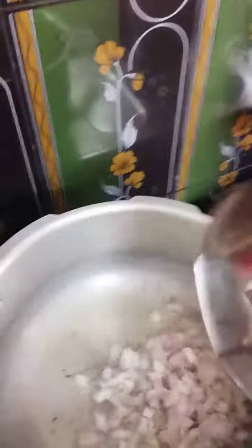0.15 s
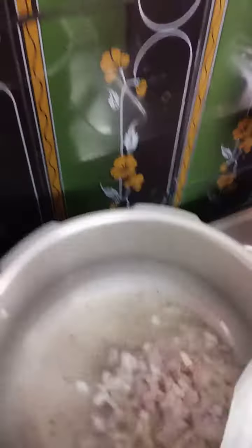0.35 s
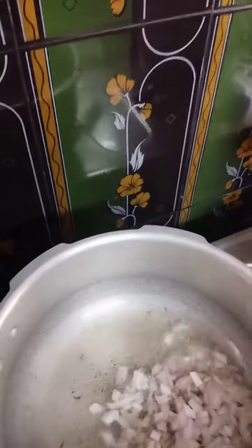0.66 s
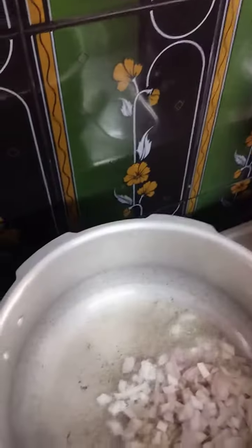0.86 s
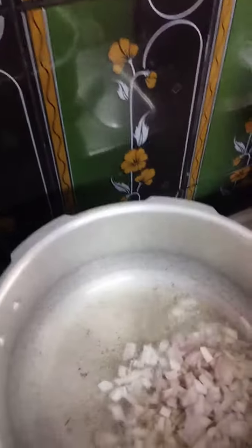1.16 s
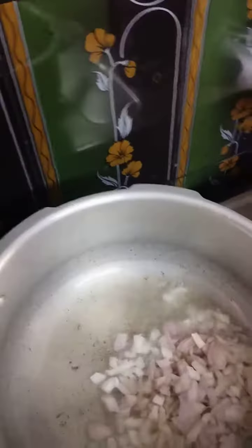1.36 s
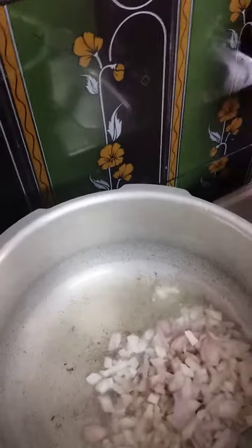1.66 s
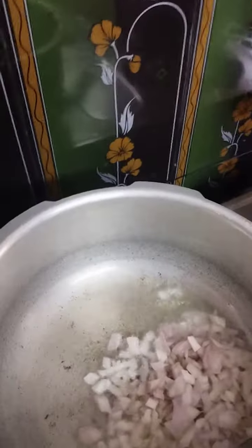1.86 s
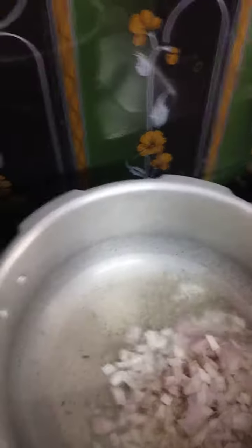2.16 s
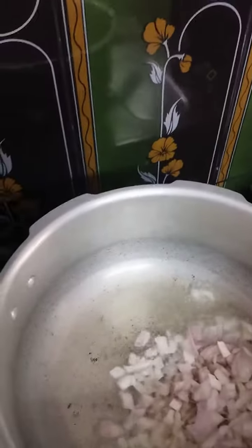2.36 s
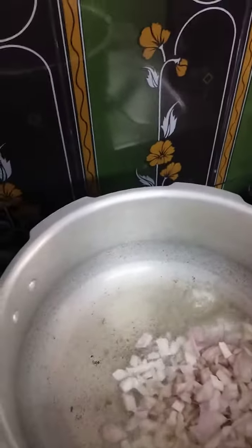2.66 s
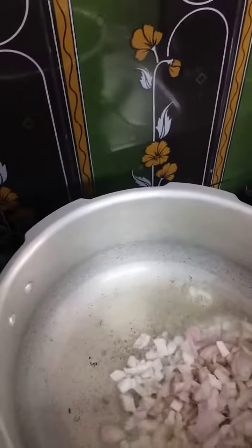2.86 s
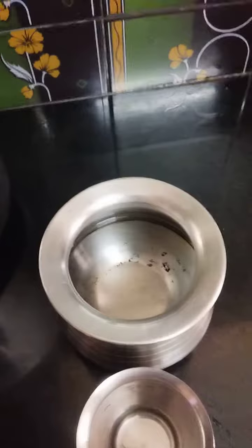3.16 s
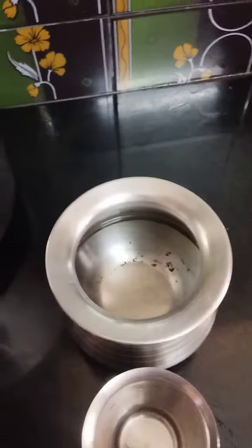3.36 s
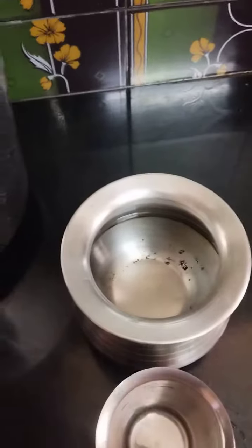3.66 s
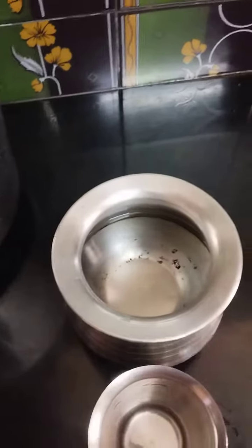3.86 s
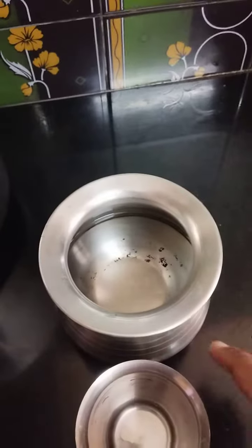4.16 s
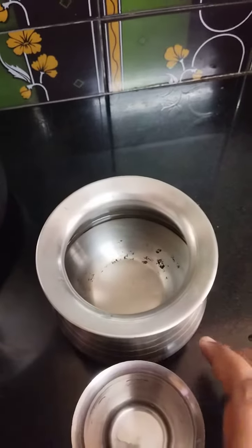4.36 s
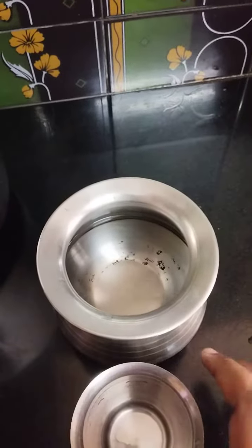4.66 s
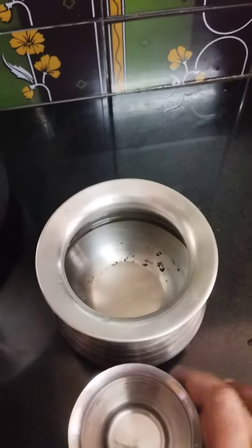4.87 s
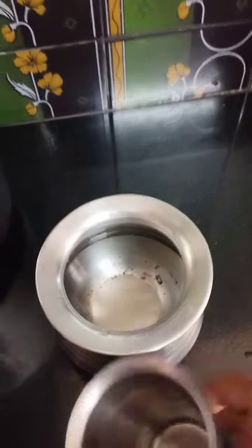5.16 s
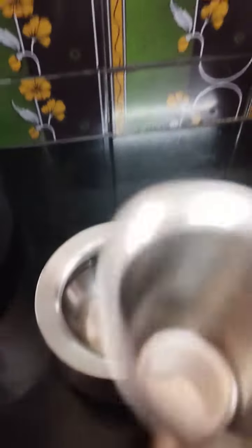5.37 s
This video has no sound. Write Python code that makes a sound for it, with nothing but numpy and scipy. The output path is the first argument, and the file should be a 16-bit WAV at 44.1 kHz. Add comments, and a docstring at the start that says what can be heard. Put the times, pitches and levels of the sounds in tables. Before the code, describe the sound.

A handheld microphone in a small home kitchen is close to crackling, seething oil with snapping bubbles. A steel bowl clatters and wobbles on the hard counter with a short scrape, then rests with a couple of dry ticks. Spatter brightens just before a hard cut to near quiet: faint far frying, small high ticks, light rubbing and low room hum.

```python
"""In a kitchen, close over a pot: onions sizzle and spit in hot oil, while a steel bowl is set down and rattles.
After 3.12 s a second scene hears the pot from across the counter: a soft hiss, a few spits and hand brushes.
Frying is clumped clicks and coloured noise with short bubble notes; the bowl is a bank of decaying modes
that each contact resets, over knocks and scrapes. Shaped noise and wavering low tones form the kitchen hum.
"""
import sys
import numpy as np
from scipy import signal
from scipy.fft import rfft, irfft, next_fast_len
from scipy.io import wavfile
from scipy.ndimage import uniform_filter1d, map_coordinates

SR = 44100
rng = np.random.default_rng(int(sys.argv[2]) if len(sys.argv) > 2 else 0)


def dump(signal):
    """Clip the signal to [-1, 1] and save it as 16-bit WAV at the path in sys.argv[1]."""
    limited = np.clip(np.atleast_2d(signal).T, -1, 1)
    pcm = np.round(limited * 32767).astype(np.int16)
    wavfile.write(sys.argv[1], SR, pcm)


N = 243343

# Close frying: strength over time [t/s, fizz and bubbling level/dB, bright spatter level/dB]
FRYING_LEVEL = [(0, -18.5, -43), (.55, -19, -29), (1.25, -20, -41), (2.6, -20, -27), (2.7, -21, -20),
                (3.11, -20.5, -28)]
# Colour of the fine fizz and the pop snaps [f/Hz, relative level per Hz/dB]
FIZZ_COLOUR = [(2060, -41.5), (3500, -4), (5230, -22), (6270, -16), (7240, -12.5), (8200, 3.5), (9000, 3),
               (11600, -7), (15700, -12)]
# Colour of the coarser bubbling [f/Hz, relative level per Hz/dB]
BUBBLING_COLOUR = [(350, -58), (600, -3.5), (1050, -9.5), (1175, 4.5), (1310, -5.5), (1560, -8.5),
                   (1830, 1), (2370, 3), (2960, 6), (3650, 1), (6500, 1), (8450, 9), (14300, -120)]
# The loudest bubbles [t/s, snap level/dB, body level/dB, body f/Hz]
POPS = [(0.4113, 3.5, -2, 3650), (0.6008, 3.5, -16, 2390), (0.618, 2, -14, 2380), (0.7752, -15, -5.5, 3000),
        (0.79, 4.5, -30, 2440), (0.9962, 5, -3.5, 4220), (1.008, 9, -28, 3040), (1.067, -15.5, -9, 2160),
        (1.087, -7, -3.5, 4350), (1.1795, -3, -10, 3900), (1.225, -14, -9.5, 2170), (1.349, -16, -3, 4040),
        (1.507, 3.5, -10, 3600), (1.747, -8, -4, 2600), (1.767, 3, -7, 2530), (2.0685, 3, -2.5, 3240),
        (2.093, 4, -13, 2960), (2.245, 3, -34, 2960), (2.3101, 6.5, -6.5, 2570), (2.614, -2, -23, 3740),
        (2.648, 8, -17, 3560), (2.682, 3, -8, 4820), (2.713, -6, -3.5, 4400), (2.717, 6.5, -7, 3270),
        (2.758, 4, -23, 2990), (2.7815, 5.5, -28, 4580), (2.89, -2, -32, 3600), (2.904, 4, -27, 3560),
        (2.913, -8, -11, 4400)]
# Modes of the steel bowl [f/Hz, family, level within the family/dB, t60/s]
BOWL_MODES = [(1572, 0, 0, .3), (1147, 0, -19, .2), (1577, 0, -10, .9), (2720, 1, 0, .5), (2692, 1, -4, .4),
              (2634, 1, -8, .4), (1527, 1, -9, .5), (4744, 2, 0, .6), (4445, 2, -12, .45),
              (2767, 2, -3, .3), (7533, 3, 0, .5), (7574, 3, -3, .5), (7488, 3, -8, .5), (6355, 2, -15, .4),
              (8900, 4, 0, .2), (10020, 3, -5, .12), (10800, 3, -7, .1)]
# The base rocks on the counter [t/s, knock level/dB, ring level of family 0/dB, clack f/Hz]
CONTACTS = [(1.31, 5.5, -4, 1375), (1.318, -20, -11, 1150), (1.327, -6, -12, 1410), (1.344, 2, -12, 1420),
            (1.358, -4, -21, 1220), (1.365, -10, -12, 1400), (1.374, -10, -7.5, 1140),
            (1.394, -20, -17, 1310), (1.413, -10.5, -23, 1390), (1.436, -12, -25, 1410),
            (1.569, 1.5, -24, 1280), (1.573, 1.5, -24, 1680), (1.587, 5, -21, 1704), (1.606, -3, -17, 1270),
            (1.62, -4.5, -23, 1250), (1.635, -4.5, -34, 1260), (1.65, -9.5, -19, 1720),
            (1.668, -20, -18, 1300), (1.686, -9, -24, 1230), (1.71, -22, -19.5, 1300),
            (1.734, -24, -32, 1290), (1.78, 6.5, -30, 1850), (1.799, -1.5, -27, 1270),
            (1.815, -2.5, -19, 1230), (1.852, -2.5, -16, 1240), (1.886, -10, -16, 1080),
            (1.908, -8, -28, 1860), (1.952, -1.5, -33, 1810), (1.982, -8, -34, 1730),
            (2.005, -10.5, -36, 1110), (2.022, -9, -41, 900)]
# The rim comes down or is touched [t/s, ring level/dB of family 1, 2, 3, 4]
LANDINGS = [(1.31, -33, -46, -41, -50), (1.573, -31, -16, -14.5, -10), (1.669, -28.5, -34, -35, -40),
            (1.78, -12, -23, -15.5, -29), (1.852, -18, -21.5, -17, -34), (1.886, -22.5, -32, -29, -45),
            (1.947, -23.5, -40, -37, -50)]
# Fade of families 1 to 4 after a landing [level change per second/dB]
FAMILY_FADES = [-84, -79, -82, -300]
# Dry ticks once the bowl rests [t/s, level/dB]
TAPS = [(2.2123, 4), (2.307, -2.5)]
# Colour of those ticks [f/Hz, relative level per Hz/dB]
TICK_COLOUR = [(250, -40), (450, 0), (1200, 1), (2500, 0.5), (4500, -3.5), (9000, -13)]
# The rim drags on the counter [t/s, level/dB ahead of the counter's resonances]
SCRAPE_LEVEL = [(1.29, -77), (1.318, -22.5), (1.524, -53.5), (1.568, -33), (1.976, -25), (2.25, -60)]
# Colour of knocks and scrape [f/Hz, relative level per Hz/dB]
COUNTER_COLOUR = [(60, -52), (130, -28), (200, -16), (350, -9), (700, -4), (1200, -1.5), (1800, -1.5),
                  (2200, -7.5), (4000, -19), (9000, -24)]
# Resonances of the counter [f/Hz, width/Hz, level/dB ahead of a common lift]
COUNTER_MODES = [(325, 17, 3.5), (744, 16, 1), (1227, 30, -5), (1300, 43, -11), (1740, 13, -15)]
# Colour of the distant frying [f/Hz, relative level per Hz/dB]
HISS_COLOUR = [(710, -16), (1200, -35), (2030, -0.5), (2390, -2), (3870, -4.5), (4170, -1), (5290, 0.5),
               (8670, 8.5), (15700, -10)]
# Far spits [t/s, level/dB, centre f/Hz]
SPITS = [(3.339, -33, 6450), (3.354, -38, 6000), (3.377, -30.5, 5400), (3.573, -33, 8300),
         (3.662, -37.5, 4730), (4.326, -31, 9500), (4.336, -23, 8450), (4.353, -25, 8200),
         (4.404, -30.5, 8900), (4.571, -29, 7560), (4.582, -25.5, 8250), (4.589, -26.5, 8300),
         (4.838, -33, 8900), (4.869, -34, 10360), (4.878, -24.5, 9000), (5.021, -34, 9600),
         (5.08, -28.5, 8700), (5.256, -30, 8600), (5.378, -32, 7700), (5.408, -32, 6950), ]
# A hand brushes the counter and lifts a cup [t/s, level ahead of the envelope/dB, centre f/Hz, t60/s]
SWISHES = [(4.337, -37.5, 544, 0.24), (4.872, -45, 940, 0.33), (5.31, -47.5, 2030, 0.94)]
# Broad hum of the kitchen [f/Hz, relative level per Hz/dB]
KITCHEN_COLOUR = [(11, -47), (18, 14.5), (32, -15), (86, -15), (129, -5), (156, -15.5), (211, -7),
                  (486, -3.5), (629, -8), (3000, -19), (3900, -71), (6600, -120)]
# The counter's low drone, louder while the bowl moves [t/s, level/dB]
DRONE_LEVEL = [(0.0, -56), (1.2, -55.5), (1.58, -50.5), (1.87, -44), (2.3, -58), (5.52, -66)]
# Colour of that drone [f/Hz, relative level per Hz/dB]
DRONE_COLOUR = [(30, -20), (55, 0.5), (95, -5.5), (125, -4), (160, -7), (300, -47.5)]
# The counter's lowest note [t/s, rms level ahead of its wavering/dB]
THRUM_LEVEL = [(1.3, -65), (1.4, -48), (1.54, -64), (1.64, -50.5), (1.92, -41), (2.04, -55), (2.15, -70)]
# A faint hum slides upward [t/s, f/Hz, level ahead of its wavering/dB]
SLIDING_HUM = [(3.42, 204, -82), (3.55, 217, -57), (3.85, 246, -54.5), (4.12, 267.6, -52.5),
               (4.2, 265, -75)]
# Narrow wavering hums [f/Hz, width/Hz, mean level/dB]
NARROW_HUMS = [(223, 46, -61), (331, 21, -58.5), (536, 12, -59)]
# Brief dips of the whole level [t/s, depth/dB]
DIPS = [(0.423, -6.5), (2.315, -8)]

CUT_S = 3.1221  # the pot is far off from here
BUBBLING_DB = -7  # against the fizz
RATTLE_S, REST_S = 1.77, 2.12  # the bowl rattles freely; it comes to rest and its ring is stilled
CLACK_DB = -10  # against the knock
JOLT = 0.31  # share of a knock's loss against its landing that the upper families follow
BLUR = .9  # phase shift of the touches, more for higher families
HISS_DB, HUM_DB = -46, -49  # distant frying; broad kitchen hum
PING_CYCLES = 50  # a spit's note falls 60 dB in this many cycles
SPRAY_DB, SPRAY_T60_S, SPRAY_OCTAVES = -12, 0.22, 0.37  # spray level against the note
THRUM_HZ = 127
DIP_FALL_S, DIP_S, DIP_RISE_S = .01, .101, .006  # the rise starts DIP_S after the fall starts
TOP_HZ = 15820  # band limit


def frying():
    """Close pot: fine fizz and coarser bubbling share many bursts; spatter and the large pops lie on top."""
    fizz_db, spatter_db = curves(FRYING_LEVEL)
    fine = crackle(2000, 4.2, 0.38, patchy_db=1.2, swell_db=.15)
    coarse = crackle(900, 6.9, 0.2, patchy_db=0.75, swell_db=.15)
    fizz = amp(fizz_db) * unit(coloured(fine, FIZZ_COLOUR))
    thinned = filtered(coarse, lambda f: 1j * f / (1500 + 1j * f))
    seethe = unit(coloured(thinned + 0.98 * fine, BUBBLING_COLOUR))
    seethe = seethe + 0.27 * bubbles(count=900, centre_hz=3800, octaves=0.33, cycles=30.0, spread_db=6)
    bubbling = amp(fizz_db + BUBBLING_DB) * seethe
    bright = bubbles(count=2500, centre_hz=8310, octaves=0.054, cycles=40, spread_db=0.5)
    spatter = amp(spatter_db) * bright
    return patches(fizz + bubbling + spatter, depth_db=1.5) + pops()


def pops():
    """A large bubble's film snaps, droplets fall back and its cavity rings for a few cycles."""
    snap, body, t = np.zeros(N), np.zeros(N), np.arange(SR // 50) / SR
    for s, snap_db, body_db, body_hz in POPS:
        start = round(s * SR)
        burst = amp(-12.0 - 60 * t / 0.0071) * rng.standard_normal(len(t))  # the droplets
        burst[0] = 1  # the film breaks
        snap[start:][:len(t)] += amp(snap_db) * burst
        attack = 1 - np.exp(-t * body_hz / 0.31)
        decay = amp(body_db - 60 * t * body_hz / 12)
        body[start:][:len(t)] += decay * attack * np.sin(2 * np.pi * body_hz * t)
    # large films ring on one note, near 8.5 kHz
    film = lambda f: 0.17 + 1j * f * 3000 / (8500 ** 2 - f * f + 1j * f * 3000)
    return filtered(coloured(snap, FIZZ_COLOUR), film) + body


def bubbles(count, centre_hz, octaves, cycles, spread_db):
    """Steam bubbles that burst with a short dry note, rms 1."""
    start = rng.random(count)
    pitch = rng.standard_normal(count)[:, None]
    size = rng.exponential(size=count)[:, None]
    hz, t = centre_hz * 2 ** (octaves * pitch), np.arange(SR // 100) / SR
    decay = amp(spread_db * np.minimum(size, 2.5) - 60 * t * hz / cycles)
    notes = decay * np.sin(2 * np.pi * hz * t)
    where = (start * N).astype(int)[:, None] + np.arange(len(t))
    mixed = np.bincount(where.ravel(), notes.ravel())[:N]
    return unit(filtered(mixed, lambda f: (1j * f / (1200 + 1j * f)) ** 2))


def crackle(per_s, spread_db, share, patchy_db, swell_db):
    """White steam noise with clumps of bursting bubbles on it, rms 1; share is the bursts' part of the power."""
    clumps = amp(patchy_db * wobble(36) + swell_db * wobble(9))
    draw = rng.random((3, N))
    happens = draw[0] < per_s / SR * clumps
    bursts = happens * np.sign(draw[1] - .5) * amp(-spread_db * np.log(draw[2] + 0.023))
    share = np.clip(share, 0, 1)
    steam = clumps * rng.standard_normal(N)
    return unit(np.sqrt(share) * unit(bursts) + np.sqrt(1 - share) * steam)


def patches(x, depth_db):
    """x with its colour shifting in random patches, some 500 Hz by 60 ms."""
    z = signal.stft(x, nperseg=256)[2]
    field = uniform_filter1d(rng.standard_normal(z.shape), size=3, axis=0)
    field = uniform_filter1d(field, size=20, axis=1)
    return signal.istft(z * amp(depth_db * unit(field)), nperseg=256)[1][:N]


def bowl():
    """Each contact changes how strongly the wall's modes ring; the counter knocks and scrapes under it."""
    ring, knocks, t = np.zeros(N), np.zeros(N), np.arange(SR // 4) / SR
    ends = [row[0] for row in CONTACTS[1:]] + [REST_S]
    phase = 2 * np.pi * rng.random(len(BOWL_MODES))
    depth_db = np.where(np.arange(N) < RATTLE_S * SR, 3, 6)
    # the rim keeps touching down, so each ring is broken
    chatter = [amp(depth_db * np.tanh(wobble(150))) for mode in BOWL_MODES]
    for (s, knock_db, low_db, clack_hz), end in zip(CONTACTS, ends):
        span = slice(round(s * SR), round(s * SR) + len(t))
        family_db = ring_levels(s, knock_db, low_db)
        gate = (1 - np.exp(-t / 0.00039)) * np.clip((end - s - t) / 0.003 + 1, 0, 1)
        # a blow jolts the phase of every mode
        phase = phase + rng.normal(0, .7 if s < RATTLE_S else 2, len(BOWL_MODES))
        for (hz, family, db, t60), p, touches in zip(BOWL_MODES, phase, chatter):
            rough = touches[span]
            decay = amp(family_db[round(family)] + db - 60 * t / t60)
            angle = 2 * np.pi * hz * (s + t) + p + BLUR * family * np.log(rough)
            ring[span] += gate * rough * decay * np.sin(angle)
        # the base's dead clack
        clack = amp(knock_db + CLACK_DB - 60 * t / 0.029) * (1 - np.exp(-t / 0.00029))
        ring[span] += clack * np.sin(2 * np.pi * clack_hz * t)
        blow = amp(-22 - 60 * t / 0.07) * rng.standard_normal(len(t))
        blow[0] = 0.55
        knocks[span] += amp(knock_db) * blow
    return ring + counter(knocks) + taps()


def ring_levels(s, knock_db, low_db):
    """Ring dB of the five families at a contact: the last landing sets the upper ones, which then fade."""
    landed, *upper_db = [row for row in LANDINGS if row[0] < s + .003][-1]
    first_db = min(CONTACTS, key=lambda row: abs(row[0] - landed))[1]
    faded_db = np.add(upper_db, np.multiply(FAMILY_FADES, s - landed))
    return [low_db, *(faded_db + JOLT * (knock_db - first_db))]


def counter(knocks):
    """The counter resonates with the bowl's knocks and with the crackling drag of its rim."""
    scrape_db, = curves(SCRAPE_LEVEL)
    drag = amp(scrape_db) * crackle(300, 4, .15, patchy_db=1.5, swell_db=.3)
    mode = lambda f, c, w, db: amp(db + 2.5) * 1j * f * w / (c * c - f * f + 1j * f * w)
    slab = lambda f: 0.79 + sum(mode(f, c, w, db) for c, w, db in COUNTER_MODES)
    return filtered(coloured(knocks + drag, COUNTER_COLOUR), slab)


def taps():
    """Dry ticks: a click with a short tail of noise."""
    ticks, t = np.zeros(N), np.arange(SR // 4) / SR
    for s, db in TAPS:
        tick = amp(-26 - 60 * t / .04) * rng.standard_normal(len(t))
        tick[0] = 1
        ticks[round(s * SR):][:len(t)] += amp(db) * tick
    return coloured(ticks, TICK_COLOUR)


def far_pot():
    """Frying from across the counter: smooth hiss, spits that ping and die in a spray, brushes of a hand."""
    steam = crackle(1500, 3, .1, patchy_db=.7, swell_db=.4)
    out = amp(HISS_DB + 0.69 * wobble(1.61)) * unit(coloured(steam, HISS_COLOUR))
    t = np.arange(SR // 3) / SR
    sounds = []
    for s, db, hz in SPITS:
        ping = amp(-60 * t * hz / PING_CYCLES) * np.sin(2 * np.pi * hz * t)
        tail = amp(SPRAY_DB - 60 * t / SPRAY_T60_S) * spray(len(t), hz, SPRAY_OCTAVES)
        sounds.append((s, amp(db) * (ping + tail)))
    for s, db, hz, t60 in SWISHES:
        envelope = amp(db - 60 * t / t60) * (1 - np.exp(-30 * t / t60))
        sounds.append((s, envelope * spray(len(t), hz, octaves=0.38)))
    for s, sound in sounds:
        start = round(s * SR)
        out[start:][:len(t)] += sound[:N - start]
    return out


def spray(length, hz, octaves):
    """Grainy noise in a band around hz over a weak white floor, rms 1."""
    f = np.fft.rfftfreq(length, 1 / SR) + 1
    grains = rng.standard_normal(length) * amp(6.2 * rng.standard_normal(length))
    band = np.exp(-(np.log2(f / hz) / octaves) ** 2) + 0.11
    return unit(irfft(rfft(grains) * band, length))


def kitchen():
    """Broad low noise and a drone, with a low note, a sliding hum and narrow hums that waver."""
    noise = lambda shape: unit(filtered(rng.standard_normal(N), shape))
    hum_db = HUM_DB + 0.21 * wobble(2.34) + 2.1 * wobble(13)
    out = amp(hum_db) * noise(lambda f: amp(along(KITCHEN_COLOUR, f)))
    drone_db, = curves(DRONE_LEVEL)
    out += amp(drone_db) * noise(lambda f: amp(along(DRONE_COLOUR, f)))
    thrum_db, = curves(THRUM_LEVEL)
    thrum_hz = THRUM_HZ + 2.5 * wobble(8)
    # 3 dB turns the rms level of a sine into its peak
    out += amp(thrum_db + 3 + 1.5 * wobble(9)) * np.sin(2 * np.pi * np.cumsum(thrum_hz) / SR)
    slide_hz, slide_db = curves(SLIDING_HUM)
    out += amp(slide_db + 4.4 * wobble(17)) * np.sin(2 * np.pi * np.cumsum(slide_hz) / SR)
    for hz, width, db in NARROW_HUMS:
        out += amp(db + 0.4 * wobble(2.3)) * noise(lambda f: np.exp(-((f - hz) / width) ** 2))
    return out


def amp(db):
    """Amplitude factor of a level in dB."""
    return 10 ** (np.asarray(db) / 20)


def unit(x):
    """x scaled to rms 1."""
    return x / np.sqrt(np.mean(x ** 2) + 1e-20)


def along(points, hz):
    """(Hz, value) points read off on a log frequency axis."""
    f, v = np.transpose(points)
    return np.interp(np.log(hz + 1), np.log(f + 1), v)


def curves(rows):
    """One value per sample for each column after the time."""
    s, *cols = np.transpose(rows)
    return [np.interp(np.arange(N) / SR, s, c) for c in cols]


def wobble(rate):
    """A smooth random curve, rate knots a second."""
    knots = rng.standard_normal(int(N * rate / SR) + 4)
    return map_coordinates(knots, [np.arange(N) * rate / SR])


def filtered(x, response):
    """x times a complex response of frequency."""
    m = next_fast_len(N + SR // 2)
    return irfft(rfft(x, m) * response(np.fft.rfftfreq(m, 1 / SR)), m)[..., :N]


def coloured(x, spectrum):
    """x through the causal minimum-phase filter with the given spectrum, at unit energy."""
    size = 4096
    gain = amp(along(spectrum, np.fft.rfftfreq(size, 1 / SR)))
    cep = irfft(np.log(gain + 1e-4))
    cep[1:size // 2] *= 2  # fold the cepstrum onto positive time
    cep[size // 2 + 1:] = 0
    kernel = irfft(np.exp(rfft(cep)))
    return signal.fftconvolve(x, kernel / np.linalg.norm(kernel))[:N]


def scene():
    """The close pot and bowl up to the cut, then the far pot, with the kitchen under both."""
    near = np.arange(N) < CUT_S * SR
    return (np.where(near, frying() + bowl(), far_pot()) + kitchen())[None]


def record(dry):
    """At the microphone the level dips twice, peaks flatten towards full scale and the top band is cut."""
    t = np.arange(N) / SR
    dip_db = np.zeros(N)
    for s, db in DIPS:
        fall = np.clip((t - s) / DIP_FALL_S, 0, 1)
        rise = np.clip((s + DIP_S - t) / DIP_RISE_S + 1, 0, 1)
        dip_db += db * fall * rise
    x = dry * amp(dip_db)
    x = x / (1 + np.abs(x) ** 8) ** (1 / 8)
    return filtered(x, lambda hz: hz < TOP_HZ)


dry = scene()
out = record(dry)
dump(out)
```